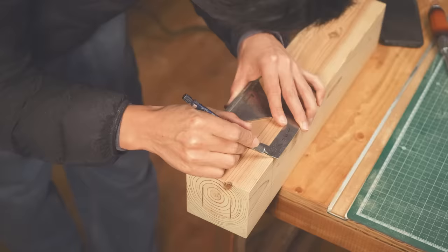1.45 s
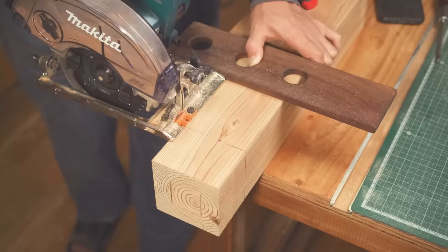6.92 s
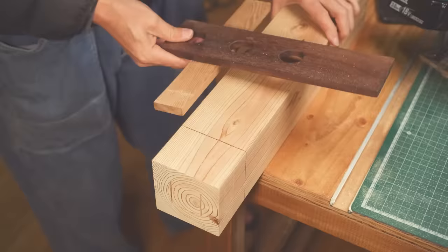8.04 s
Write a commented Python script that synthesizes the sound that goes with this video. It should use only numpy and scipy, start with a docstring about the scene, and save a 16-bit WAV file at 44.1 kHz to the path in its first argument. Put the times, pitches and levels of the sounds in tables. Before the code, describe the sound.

Close by at a workshop bench, a pencil scratches along a wooden beam in short strokes for the first 2.3 seconds, with faint squeaks, light knocks and a low rumble. After a brief rub of hands on wood, an offcut falls at about 3.1 seconds and bounces loudly until 3.7, ringing, booming on the floor and stirring the room over a soft sleeve rustle. The shop noise cuts out at 4 seconds. Small clicks follow, and something like a small geared motor whirs quietly at a wandering speed from 4.5 to 5.4. From 5.6 to 7 the shop noise is back while a square rubs over the timber and is tapped into place. The motor whirs again from 7.2 to 7.8 and clicks off. At 8.1 a board scrapes over the wood, then slaps down with a quick chatter near 8.6 seconds.

```python
"""Timber handled at a workshop bench, heard close by on one microphone. An offcut falls and bounces on
the booming floor, each contact ringing the wood and stirring the room. Before it a pencil scratches on a
beam; after it a square and boards rub over the timber in tiny slips and are knocked into place.
In two lulls something like a small geared motor clicks on, whirs at a wandering speed and clicks off.
Behind the work, the shop noise cuts in and out abruptly."""
import sys
import numpy as np
from scipy import signal
from scipy.fft import rfft, irfft, next_fast_len
from scipy.io import wavfile
from scipy.ndimage import map_coordinates

SR = 44100
rng = np.random.default_rng(int(sys.argv[2]) if len(sys.argv) > 2 else 0)


def store_wav(level_fs):
    """Save 16-bit WAV to argv[1]."""
    pcm = np.round(np.clip(np.atleast_2d(level_fs), -1, 1) * 32767)
    wavfile.write(sys.argv[1], SR, pcm.T.astype(np.int16))


N = 387638
TIME = np.arange(N) / SR

# Levels in the tables are relative; each source adds its own gain.
# the offcut on the floor:
# (time [s], strength [dB], weight [dB], hardness [dB], edgewise [0-1], boom [dB], ring time [share])
BOUNCES = [(3.082, -27.5, 18.5, -3.5, .85, -4, .5), (3.171, -20.5, 8.5, -3.5, .1, -10, .85),
           (3.355, -12.5, -2, 1, .02, 1.5, .97), (3.664, -15.5, 2.5, 6, .95, -16, .88),
           (3.688, -22, 2, 1, .9, -14, .8)]
# knocks on the bench: (time [s], strength [dB], weight [dB], hardness [dB], edgewise [0-1])
BENCH_KNOCKS = [(.327, -33, 10, 0, .89), (.342, -31, 6.5, -.5, .77), (1.216, -30, -13, -3, .97),
                (2.291, -32, -7, 4, .21), (2.312, -35, 2, 0, .6), (2.84, -31, 7.5, -6, .7),
                (5.989, -34, -8, 7, .5), (6.092, -34, -2, -1, .35), (6.27, -34.5, -12, -10, .1),
                (6.59, -27.5, 14, -9, .1), (6.606, -33, 14, 16, .05), (6.635, -34, 13, -1, .1),
                (6.736, -31, 7.5, 11, .04), (6.756, -27, -8, -12, .1), (8.521, -36, -5, 8, .5)]
# small clicks in and around the lulls: (time [s], strength [dB], weight [dB], hardness [dB])
SMALL_CLICKS = [(4.184, -42, 2, 3), (4.193, -38, 4, -14), (4.323, -42, 2, -6), (4.359, -59, 2, 9),
                (4.427, -59, 7, 0), (4.473, -53, -3, 18), (5.415, -67, 5, 14), (5.503, -67, 4, 6),
                (5.523, -67, -5, 26), (7.088, -61, 13, 1), (7.128, -59, -7, 23), (7.835, -64, 2, 17),
                (7.888, -67, 4, 8), (7.905, -51, 1, 10)]
# ringing wood: (frequency [Hz], struck flat [dB], struck on edge [dB], base t60 [s])
OFFCUT_MODES = [(47, -5.5, -6, 0.9), (67.3, -1, -4, 1.05), (117.4, -10, -4.5, .4), (190.4, 0.5, -8.5, 0.34),
                (228, -5, -5, 0.53), (336, -5, -1, .36), (472, -21, -7, .9), (673, 1, -3.5, 0.3),
                (807, -7, -15, 0.35), (884, -4, -16, 0.29), (1226, 4, -25.5, .42), (1270, 1, -4.5, 0.36),
                (1525, -7, -16, 0.59), (1630, -4, -13.5, 0.17), (2080, -4.5, -11, .42),
                (2307, -1, -6.5, 0.38), (2660, -25.5, -2, 0.18), (2876, -31.5, -2.5, 0.32),
                (3140, -27.5, -2, 0.29), (3430, -13, -6.5, .33), (3720, -22.5, -6.5, .33)]
BENCH_MODES = [(113.4, 2.5, -0.5, 0.16), (158.6, 4, -1.5, 0.33), (223, -3, -3, 0.12),
               (270.6, -10, 4.5, 0.22), (464.3, 4, -8, 0.077), (597, -3, -12, 0.15), (819, -19.5, -11, 0.2),
               (994, -12, -12.5, 0.12), (1195, -17, -6, 0.13), (1846, -2, -10.5, 0.15),
               (2274, -11, -16, 0.13), (3660, -4.5, -22, 0.08), (3900, -3, -18, 0.13),
               (4890, -7.5, -14, 0.079), (7160, -2, -20.5, 0.1)]
# what rings under those small clicks: (frequency [Hz], level [dB], t60 [s])
CLICK_MODES = [(376, 2.5, .07), (470, -1, .07), (1550, -10.5, .025), (4550, -8.5, .015), (8150, -9.5, .025),
               (11440, -13.5, 0.018)]
# a plain blow on each object, by register: (boom [dB], thud [dB], knock [dB], clack [dB], tick [dB])
OFFCUT_COLOUR, BENCH_COLOUR = (0, 0, 0, -2.5, -20), (-20, 0, 0, -9, -11)
SLAP_COLOUR, CLICK_COLOUR = (-1, 0, 0, -6.5, -18), (-28, 0, 0, -10, 0)
BLOW_EDGES_HZ = [40, 110, 400, 1500, 4000, 16000]  # bounds of those registers: (frequency [Hz])
BLOW_ATTACKS_S = [.1, .05, .025, .025, .012]  # the attack in each register: (length [s])

# strokes over the timber: (start [s], length [s], wood rasp [dB], grit [dB], bench drone [dB])
PENCIL_MOVES = [(-.03, .08, -43, -44, -36), (.03, .26, -47, -47, -44), (.32, .13, -41, -45.5, -36),
                (.575, .012, -46, -46, -46), (.72, .14, -54, -51, -50), (.85, .25, -49, -46.5, -39),
                (1.24, .2, -52, -49, -54), (1.47, .035, -43, -41, -48), (1.83, .19, -43, -45.5, -38),
                (2.17, .11, -49, -56, -43), (2.26, .06, -39, -41.5, -34)]
HAND_MOVES = [(2.33, .04, -39, -37.5, -52), (2.93, .06, -39, -47, -39)]
SQUARE_MOVES = [(5.77, .17, -62, -55, -65), (5.955, .085, -31, -31, -36), (6.03, .06, -35, -37, -42),
                (6.11, .06, -42, -40, -36), (6.19, .66, -48.5, -49.5, -42), (6.32, .06, -42, -42, -35),
                (6.45, .045, -49, -45, -50), (6.53, .06, -41, -39, -37), (6.66, .085, -44, -42, -32),
                (6.875, .08, -44, -39.5, -42)]
BOARD_MOVES = [(8.08, .035, -49, -50, -38), (8.155, .06, -28, -27, -33), (8.185, .055, -21, -23, -30),
               (8.25, .075, -35, -34.5, -23.5), (8.39, .045, -48, -46, -38), (8.495, .1, -32, -32, -30),
               (8.67, .12, -44, -36, -34)]
# colour of each rubbing: (frequency [Hz], level [dB])
PENCIL_SPECTRUM = [(12, -30), (20, 9), (40, 2.5), (74, -31), (116, -6), (434, -22), (574, -19),
                   (873, -24.5), (1810, -31), (2460, -36), (4670, -36), (14700, -44.5), (16000, -46)]
HAND_SPECTRUM = [(12, -31.5), (20, -1.5), (116, -6), (301, -14), (590, -13.5), (660, -16), (7950, -27.5),
                 (16000, -36)]
SQUARE_SPECTRUM = [(12, -49), (20, -10), (43, -2), (86, -18), (150, 2.5), (277, -12), (434, -14),
                   (873, -18), (1860, -19.5), (3530, -25.5), (4420, -22), (13200, -29), (16000, -31)]
BOARD_SPECTRUM = [(12, -41), (20, -11), (44, -2), (88, -21), (146, 3.5), (388, -12.5), (459, -6.5),
                  (642, -16.5), (825, -11.5), (1440, -17.5), (4810, -22), (16000, -31.5)]
# resonances under the rubbing: (frequency [Hz], width [Hz], gain [dB])
PENCIL_PEAKS = [(196, 21, -8), (1760, 200, -7.5), (4630, 550, -2), (8010, 220, 1.5)]
HAND_PEAKS = [(1660, 60, 1.5), (2450, 49, -8), (4460, 270, -8.5)]
TIMBER_PEAKS = [(156, 39, 1.5), (435, 40, -10), (620, 60, 0), (1870, 90, -8.5), (3900, 300, -13.5),
                (7200, 660, -6)]
RUB_EDGES_HZ = [20, 90, 350, 3000, 16000]  # bounds of rumble, drone, rasp and grit: (frequency [Hz])
# the lead or an edge sings: (time [s], half length [s], pitch [Hz], level [dB])
EDGE_SQUEAKS = [(.535, .014, 8200, -54), (.64, .014, 8200, -52), (1.0, .12, 5600, -54),
                (1.05, .014, 4800, -49), (1.683, .014, 5000, -44), (1.785, .014, 4300, -51),
                (1.96, .12, 1750, -46), (1.96, .1, 4700, -51), (2.2, .08, 1750, -50),
                (2.975, .035, 1660, -41)]

# motor speed through each run: (time [s], gear whine [Hz])
FIRST_RUN = [(4.5, 2656), (4.526, 2864), (4.65, 3289), (4.764, 2990), (4.838, 2875), (4.96, 3012),
             (5.2, 2831), (5.25, 3041), (5.396, 3330), (5.405, 3285)]
SECOND_RUN = [(7.155, 2664), (7.225, 3064), (7.299, 3294), (7.499, 2791), (7.617, 2779), (7.741, 3183),
              (7.809, 3308), (7.821, 3268), (7.83, 3126)]
# the motor's parts: (cruise [dB], extra at the start [dB], rise with speed [dB/octave], drift [dB/s])
WHINE, HUM, HISS = (-62, 20, 30, -1), (-48, -10, 14, -26), (-44, 7, 17, -2.5)
BRUSH_SPECTRUM = [(200, -80), (600, -55), (1200, -26), (2200, -21), (4200, -12), (6000, -6.5), (8500, -7),
                  (11600, 0), (13000, -4.5), (16000, -8)]  # the motor's brushes: (frequency [Hz], level [dB])

# passing sleeves, rumble under the pencil, the shop in each lull: (time [s], level [dB])
SLEEVE_LEVELS = [(3.08, -59.5), (3.33, -40), (3.41, -56.5), (3.52, -42.5), (3.7, -52.5), (3.97, -61)]
RUMBLE_LEVELS = [(0.0, -37), (0.13, -31), (0.23, -41), (1.06, -34), (1.19, -53), (1.24, -41), (1.53, -40),
                 (1.6, -33), (1.83, -35), (1.97, -46), (2.22, -33), (2.34, -35)]
LULL_LEVELS = [
    [(4.065, -54), (4.45, -54.5), (4.6, -75), (5.45, -86), (5.635, -81)],
    [(6.985, -48), (7.12, -62.5), (7.3, -73), (7.87, -81), (8.095, -72.5)],
]
# colours of those three and of the room's echo: (frequency [Hz], level [dB])
SLEEVE_SPECTRUM = [(1800, -25), (3000, -0.5), (7800, -3), (10000, -12.5), (16000, -20)]
RUMBLE_SPECTRUM = [(12, -30), (20, 6), (40, 2.5), (74, -24), (150, -50), (1000, -120)]
LULL_SPECTRUM = [(30, -33), (90, -5.5), (220, -17.5), (350, -4), (600, -18.5), (1200, -23.5), (3000, -28),
                 (16000, -37)]
ECHO_SPECTRUM = [(30, -4), (100, 0.5), (300, 11.5), (900, 8.5), (3000, -0.5), (4300, -6), (6000, -1.5),
                 (9000, -9.5), (16000, -25.5)]
# steady shop noise behind each job: (on [s], off [s], rumble [dB], bass [dB], middle [dB], treble [dB])
PENCIL_ROOM = (0.0, 2.345, -48, -43, -45.5, -52.3)
HAND_ROOM = (2.35, 4.055, -42, -45, -47, -51)
SQUARE_ROOM = (5.642, 6.981, -58, -58, -51.5, -58)
BOARD_ROOM = (8.102, 8.79, -44, -40, -48, -53)
ROOM_DECAY = [(50, 1), (200, 0.51), (1000, 0.58), (2700, 0.47), (6000, 0.9), (14000, .15)]  # the shop's reverberation: (frequency [Hz], base t60 [s])
TOP_HZ = 15900


def falling_offcut():
    """The offcut bounces on the booming floor; its ring cuts off at the first lull."""
    bounces = blows([contact(OFFCUT_COLOUR, *row) for row in BOUNCES], OFFCUT_MODES, size=40000, db=.5,
                    crack_db=20, crack_t60=.022, echo_db=5, echo_share=.98, build_cycles=1.8, top_db=-7)
    return bounces * np.interp(TIME, [4.052, 4.06], [1, 0])


def slapped_board(start_s=8.573, first_gap_s=.017, shrink=.88):
    """A board chatters on the bench: each rebound comes sooner, weaker, duller and with more weight."""
    times = start_s + np.r_[0, np.cumsum(first_gap_s * shrink ** np.arange(4))]
    rebounds = [contact(SLAP_COLOUR, s, strength=-13.5 - 3.5 * k, weight=-5.5 + 2.7 * k,
                        hardness=8 * .1 ** k, edgewise=.72, ring=.65) for k, s in enumerate(times)]
    return struck_bench(rebounds, top_db=-2)


def struck_bench(contacts, top_db):
    """The bench rings briefly under each contact, with a short echo from the room."""
    return blows(contacts, BENCH_MODES, size=14000, db=-.5, crack_db=7.5, crack_t60=.029,
                 echo_db=1.5, echo_share=.4, build_cycles=.75, top_db=top_db)


def contact(colour, s, strength, weight, hardness, edgewise=0, boom=0, ring=1):
    """One blow: weight fills its bass, hardness its treble; hard and edgewise contacts clack more."""
    shift_db = [weight + boom, weight, 0, .7 * hardness + 4 * edgewise, hardness]
    return s, strength + np.add(colour, shift_db), ring, edgewise


def blows(contacts, modes, size, db, crack_db, crack_t60, echo_db, echo_share, build_cycles, top_db):
    """Each contact cracks, rings the modes and stirs the shop."""
    out, t = np.zeros(N + size), np.arange(size) / SR
    for s, levels, ring_share, edgewise in contacts:
        ring, peaks = 0, []
        for k, (hz, *gains, t60) in enumerate(modes):
            # flat and edgewise blows bend the wood differently; low modes take longest to build
            gain_db = np.interp(edgewise, [0, 1], [gains[0], gains[-1]]) + rng.normal(0, 1)
            build = 1 - np.exp(-t * hz / build_cycles)
            decay = amp(gain_db - 60 * t / (t60 * ring_share))
            ring += (-1) ** k * build * decay * np.sin(2 * np.pi * hz * t)
            peaks.append((hz, .02 * hz + 10, gain_db + 12))
        crack = amp(crack_db - 60 * t / crack_t60) * rng.standard_normal(size)
        echo = room_echo(size, peaks, echo_share * ring_share, echo_db)
        out[round(s * SR):][:size] += amp(db) * colour_blow(ring + crack + echo, levels, top_db)
    return out[:N]


def colour_blow(blow, levels, top_db):
    """Where a blow lands sets the strength of its attack in each register, from boom to tick."""
    edges = np.array(BLOW_EDGES_HZ)
    gains_db = []
    for level, attack_s, lo, hi in zip(levels, BLOW_ATTACKS_S, edges, edges[1:]):
        attack = blow[:round(attack_s * SR)]
        power = np.sum(np.abs(rfft(attack, SR)[lo:hi]) ** 2) * 2 / (SR * len(attack))
        gains_db.append(level - 10 * np.log10(power))
    centres = np.sqrt(edges[1:] * edges[:-1])
    return causal(blow, [*zip(centres, gains_db), (TOP_HZ, gains_db[-1] + top_db)])


def pencil():
    """The lead scratches along the beam."""
    levels = strokes(PENCIL_MOVES, PENCIL_ROOM, attack_s=.025, rub_t60=.15, drone_t60=.2, rumble_db=-12)
    return rubbing(levels, PENCIL_SPECTRUM, PENCIL_PEAKS, slips_per_s=1300, grit=.27, judder_db=1.25)


def sliding():
    """Hands, then the square, then a board rub over the timber."""
    hands = strokes(HAND_MOVES, HAND_ROOM, attack_s=.025, rub_t60=.8, drone_t60=.8, rumble_db=0)
    square = strokes(SQUARE_MOVES, SQUARE_ROOM, attack_s=.05, rub_t60=.3, drone_t60=.4, rumble_db=-8)
    board = strokes(BOARD_MOVES, BOARD_ROOM, attack_s=.05, rub_t60=.22, drone_t60=.42, rumble_db=-15)
    return amp(-.5) * (
        rubbing(hands, HAND_SPECTRUM, HAND_PEAKS, slips_per_s=6200, grit=.11, judder_db=.16)
        + rubbing(square, SQUARE_SPECTRUM, TIMBER_PEAKS, slips_per_s=1500, grit=.12, judder_db=.97)
        + rubbing(board, BOARD_SPECTRUM, TIMBER_PEAKS, slips_per_s=2000, grit=.35, judder_db=.6))


def strokes(moves, room, attack_s, rub_t60, drone_t60, rumble_db):
    """Level curves in four bands: each stroke swells, holds and dies over the steady shop noise."""
    on, off, *room_db = room
    t = np.linspace(on, off, 1000)
    power = amp(room_db)[:, None] ** 2 * np.ones_like(t)
    for start, length, rasp, grit, drone in moves:
        swell = np.sin(np.pi / 2 * np.clip((t - start) / attack_s, 0, 1)) ** 2
        after = np.maximum(t - start - length, 0)
        slide, ring = -60 * after / rub_t60, -60 * after / drone_t60
        power += (swell * amp([drone + rumble_db + ring, drone + ring, rasp + slide, grit + slide])) ** 2
    return np.c_[t, 10 * np.log10(power.T)]


def rubbing(curves, spectrum, peaks, slips_per_s, grit, judder_db):
    """Slips between two surfaces drive the timber; the stroke judders and the bench drones under it."""
    span, gate, levels = stretch(curves, margin_s=.003)
    slips = grains(len(span), slips_per_s, grit) * amp(judder_db * wobble(70, len(span)))
    rub = filtered(slips, lambda hz: amp(along(spectrum, hz)) * resonances(hz, peaks))
    out = np.zeros(N)
    for level, lo, hi in zip(levels, RUB_EDGES_HZ, RUB_EDGES_HZ[1:]):
        out[span] += gate * amp(level) * unit(filtered(rub, lambda hz: band(hz, lo, hi)))
    return out


def squeaks(width=.08):
    """Stick and slip sings in a narrow band that swells and fades; width is a share of the pitch."""
    out = np.zeros(N)
    for s, half_s, pitch, db in EDGE_SQUEAKS:
        span = np.flatnonzero(np.abs(TIME - s) < .3)
        noise = rng.standard_normal(len(span))
        chirp = unit(filtered(noise, lambda hz: np.exp(-((hz / pitch - 1) / width) ** 2)))
        out[span] += amp(db) * chirp * np.exp(-((TIME[span] - s) / half_s) ** 2)
    return out


def motor(run, gear_ratio=5.39, cruise_hz=3000, slack_hz=2900, settle_s=.24):
    """The shaft hums, a gear whines and the brushes hiss, loudest as the motor takes up its load."""
    span, gate, (gear_hz,) = stretch(run, margin_s=.023)
    size = len(span)
    age, octaves = np.arange(size) / SR, np.log2(gear_hz / cruise_hz)
    load = np.exp(-(age / settle_s) ** 2)
    whine_db, hum_db, hiss_db = (db + start_db * load + per_octave * octaves + drift * age
                                 for db, start_db, per_octave, drift in (WHINE, HUM, HISS))
    # at low speed the gear falls slack and the tones falter
    slack_db = .04 * np.maximum(slack_hz - gear_hz, 0) * (age > settle_s)
    shaft_hz = gear_hz / gear_ratio * (1 - .35 * (1 - gate)) * (1 + .003 * wobble(90, size))
    turn = 2 * np.pi * np.cumsum(shaft_hz) / SR
    orders = {k: np.sin(k * turn + rng.uniform(0, 2 * np.pi)) * amp(3.8 * wobble(7.6, size))
              for k in range(2, 29)}
    sparks = grains(size, 3500, .35) * (1 + .4 * np.cos(turn))
    buzz = unit(sum((k - 1) * orders[k] for k in orders))  # sharp contacts favour high orders
    brushes = unit(filtered(sparks + .72 * buzz, lambda hz: amp(along(BRUSH_SPECTRUM, hz))))
    shaft = unit(np.sin(turn + .4 * wobble(120, size)) * amp(2.64 * wobble(39.8, size)))
    shaft += amp(-10) * unit(orders[2] / 2 + orders[3] / 2 + 2 * orders[4])
    gear = unit(np.sin(gear_ratio * turn + .35 * wobble(400, size)) * amp(2.7 * wobble(79.6, size)))
    hiss = amp(hiss_db + 1.3 * wobble(45, size)) * brushes
    whine = gate * amp(whine_db - slack_db + 3 * wobble(18, size)) * gear
    out = np.zeros(N)
    out[span] = gate * (hiss + amp(hum_db - slack_db) * shaft + whine)
    return out


def small_clicks():
    """Small clicks in the lulls, before and around each run, almost dry."""
    clicks = [contact(CLICK_COLOUR, *row) for row in SMALL_CLICKS]
    return blows(clicks, CLICK_MODES, size=8000, db=-.5, crack_db=4.5, crack_t60=.04,
                 echo_db=-4, echo_share=.13, build_cycles=.63, top_db=-2)


def room_echo(size, peaks, decay_share, db):
    """The shop answers a blow with dying noise in the colour of what was struck."""
    hz, when, noise = signal.stft(rng.standard_normal(size), SR, nperseg=256)
    t60 = along(ROOM_DECAY, hz)[:, None] * decay_share
    fade_db = along(ECHO_SPECTRUM, hz)[:, None] - 60 * when / t60
    echo = signal.istft(noise * amp(fade_db + db), nperseg=256)[1][:size]
    return filtered(echo, lambda f: resonances(f, peaks))


def hush(curve, spectrum):
    """Soft noise on one level curve: sleeves, rumble or the quiet shop."""
    span, gate, (level,) = stretch(curve, margin_s=.0036)
    noise = unit(filtered(rng.standard_normal(len(span)), lambda hz: amp(along(spectrum, hz))))
    out = np.zeros(N)
    out[span] = noise * gate * amp(level)
    return out


def grains(size, per_s, share):
    """Tiny slips of uneven strength take a share of the power of a smooth hiss."""
    slips = (rng.random(size) < per_s / SR) * rng.standard_normal(size)
    return np.sqrt(share) * unit(slips) + np.sqrt(1 - share) * rng.standard_normal(size)


def resonances(hz, peaks):
    """Gain of a flat path plus resonant peaks."""
    return 1 + sum(amp(db) * 1j * hz * width / (centre ** 2 - hz ** 2 + 1j * hz * width)
                   for centre, width, db in peaks)


def amp(db):
    """Decibels to gain."""
    return 10 ** (np.asarray(db) / 20)


def unit(x):
    """Scaled to rms 1."""
    return x / np.sqrt(np.mean(x ** 2) + 1e-20)


def along(points, hz):
    """A curve read on a log frequency axis."""
    knots_hz, values = np.transpose(points)
    return np.interp(np.log(hz + 1), np.log(knots_hz + 1), values)


def stretch(rows, margin_s):
    """The samples that a curve spans, a gate that opens over the margin, and its columns."""
    s, *columns = np.transpose(rows)
    span = np.flatnonzero((TIME > s[0] - margin_s) & (TIME < s[-1] + margin_s))
    t = TIME[span]
    gate = np.clip(np.minimum(t - s[0], s[-1] - t) / margin_s + 1, 0, 1)
    return span, gate, [np.interp(t, s, column) for column in columns]


def wobble(knots_per_s, size):
    """A smooth random curve."""
    knots = rng.standard_normal(size // 50 + 4)
    return map_coordinates(knots, [np.arange(size) * knots_per_s / SR], mode="mirror")


def filtered(x, response):
    """x shaped by a frequency response."""
    m = next_fast_len(len(x) + 8192)
    return irfft(rfft(x, m) * response(np.fft.rfftfreq(m, 1 / SR)), m)[:len(x)]


def band(hz, lo_hz, hi_hz):
    """Gain of a band with soft edges."""
    return ((1 + (lo_hz / (hz + 1)) ** 8) * (1 + (hz / hi_hz) ** 8)) ** -.5


def causal(x, points):
    """x coloured by (frequency [Hz], gain [dB]) points, with nothing ahead of its attack."""
    m = 2 * next_fast_len(len(x))
    cepstrum = irfft(np.log(amp(along(points, np.fft.rfftfreq(m, 1 / SR)))))
    fold = np.r_[1, np.full(m // 2 - 1, 2), np.zeros(m // 2)]  # minimum phase
    return irfft(rfft(x, m) * np.exp(rfft(cepstrum * fold)))[:len(x)]


def scene():
    """The work, the motor and the shop behind them, in mono from beside the bench."""
    sleeves = amp(8) * hush(SLEEVE_LEVELS, SLEEVE_SPECTRUM)
    rumble = hush(RUMBLE_LEVELS, RUMBLE_SPECTRUM)
    lulls = sum(hush(curve, LULL_SPECTRUM) for curve in LULL_LEVELS)
    whir = motor(FIRST_RUN) + motor(SECOND_RUN)
    friction = pencil() + squeaks() + sliding()
    knocks = [contact(BENCH_COLOUR, *row, ring=.75) for row in BENCH_KNOCKS]
    impacts = falling_offcut() + struck_bench(knocks, top_db=-7) + slapped_board()
    return (impacts + friction + whir + small_clicks() + sleeves + rumble + lulls)[None]


def record(dry):
    """At the microphone the hardest blows flatten at full scale; nothing passes above the band limit."""
    clipped = dry[0] / (1 + np.abs(dry[0]) ** 8) ** (1 / 8)
    return filtered(clipped, lambda hz: hz < TOP_HZ)[None]


dry = scene()
out = record(dry)
store_wav(out)
```